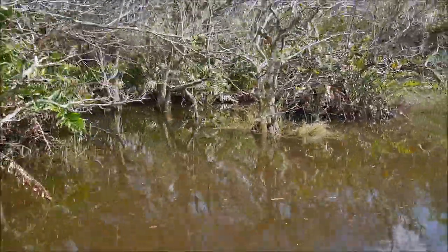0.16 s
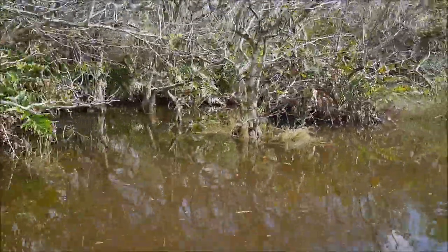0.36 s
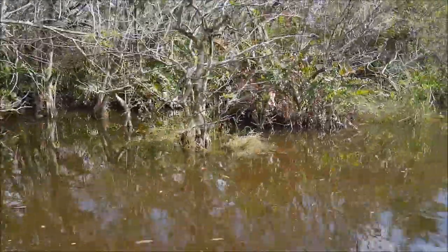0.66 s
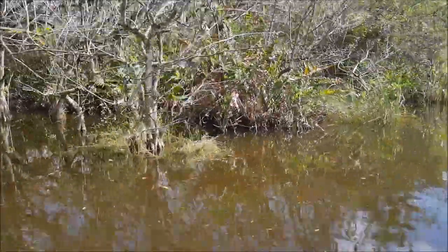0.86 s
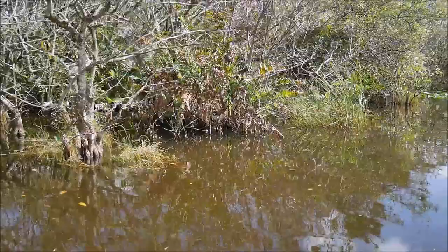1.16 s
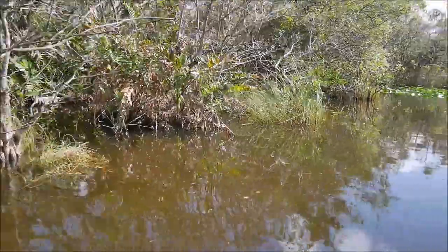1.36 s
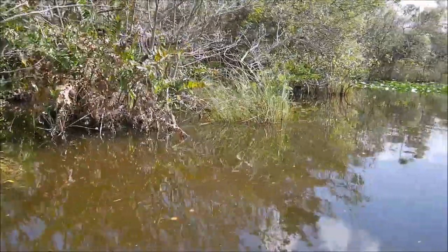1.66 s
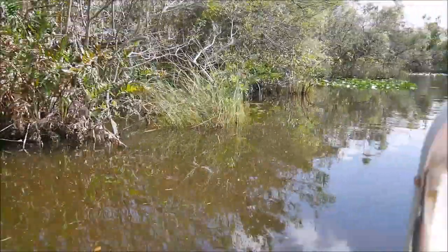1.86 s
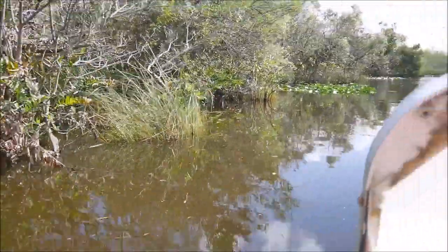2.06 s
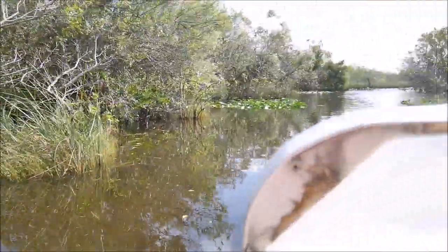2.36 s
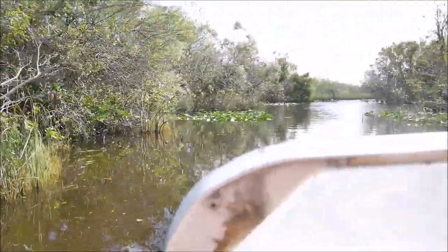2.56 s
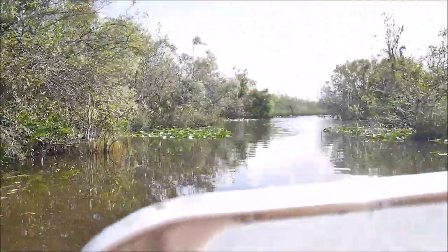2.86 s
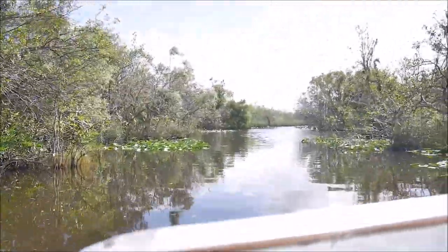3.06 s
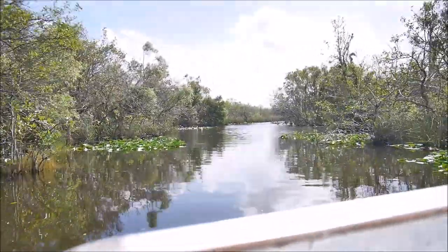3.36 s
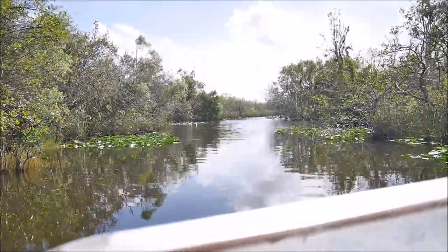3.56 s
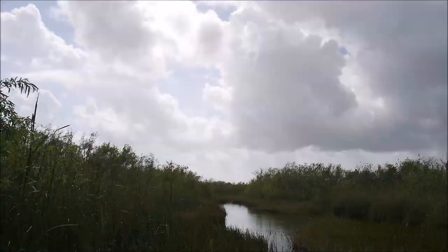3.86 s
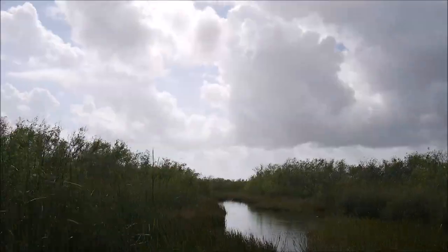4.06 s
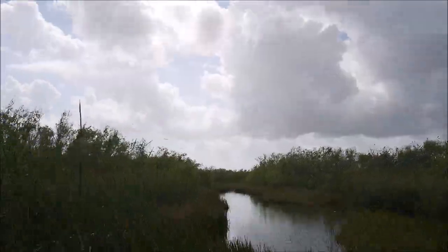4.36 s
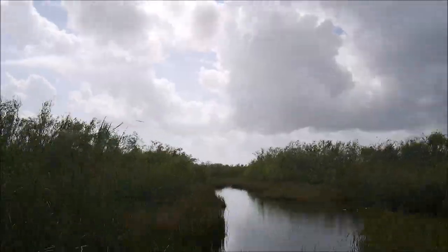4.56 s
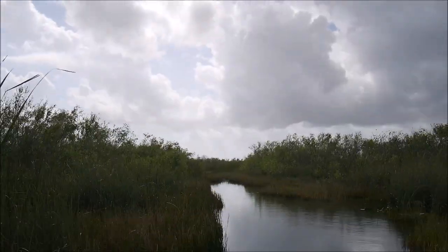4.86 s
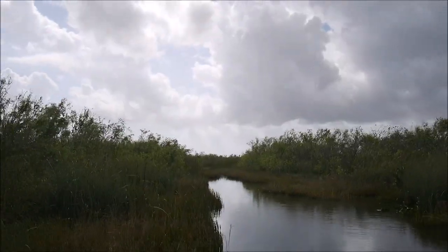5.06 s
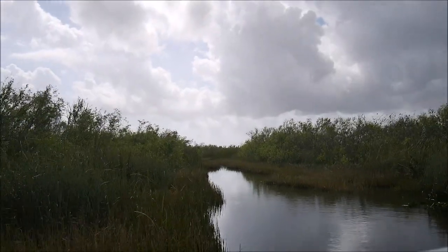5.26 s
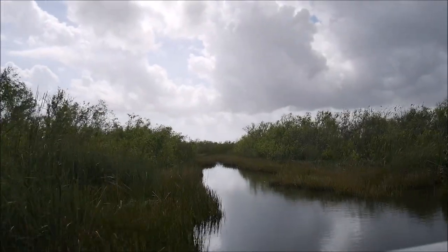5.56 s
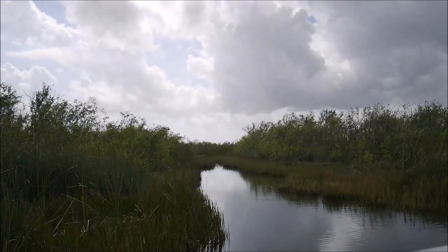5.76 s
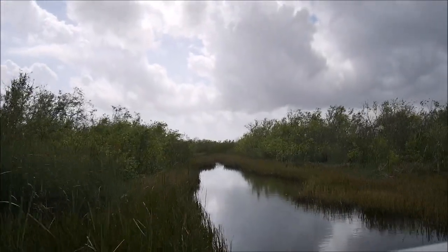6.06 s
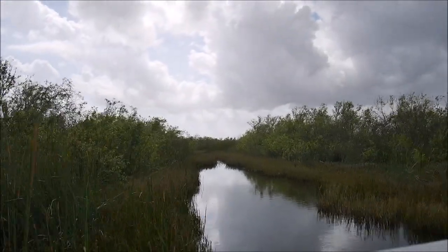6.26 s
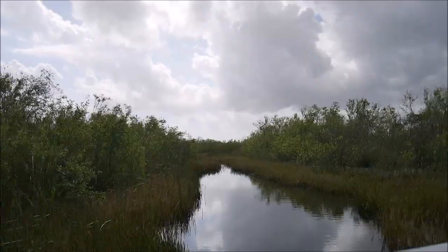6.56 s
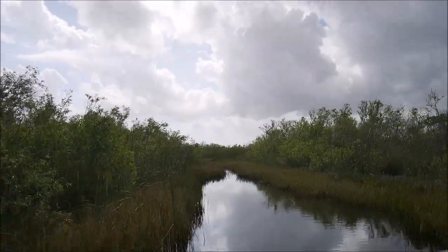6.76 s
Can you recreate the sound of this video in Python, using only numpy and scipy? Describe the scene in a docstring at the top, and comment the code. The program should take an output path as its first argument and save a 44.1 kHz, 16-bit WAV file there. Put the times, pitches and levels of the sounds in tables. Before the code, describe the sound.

Heard from a seat on an airboat in an open wetland channel, a big engine idles unevenly, its propeller thrumming and a slipping belt chirping rapidly over hiss and a thin whine. After almost four seconds it cuts abruptly to a brief silence. Then the engine cruises at nearly double speed, a dense propeller drone with ticking treble hiss and low wind gusts buffeting the microphones.

```python
"""On the water along a bushy bank: an airboat heard from a seat on board, in two stretches split by a brief silence.
First it idles: uneven cylinder firings make the exhaust lope, blade passes make the propeller thrum,
a pulley whines and a slipping belt chirps each engine cycle.
Then it cruises at nearly twice the speed: the same tone sums make propeller and exhaust drone,
a treble hiss ticks, and gusty low noise is the headwind buffeting the microphones."""
import sys
import numpy as np
from scipy import signal
from scipy.fft import rfft, irfft
from scipy.io import wavfile
from scipy.ndimage import uniform_filter1d

SR = 44100
rng = np.random.default_rng(int(sys.argv[2]) if len(sys.argv) > 2 else 0)


def unload_wav(signal):
    """Save mono or channel-first audio to the path in sys.argv[1] as 16-bit WAV at rate SR, clipped to [-1, 1]."""
    wavfile.write(
        sys.argv[1],
        SR,
        np.round(np.clip(np.atleast_2d(signal).T, -1, 1) * 32767).astype(np.int16),
    )


N = 304290
T = np.arange(N) / SR
HZ = np.fft.rfftfreq(N, 1 / SR)
IDLING, CRUISING = (0, 3.851), (4.15, 6.95)  # start and end of each stretch, s


def amp(db):
    """Logarithmic level: decibels to gain."""
    return 10 ** (np.asarray(db) / 20)


def unit(x):
    """Power normalization: scales to an rms of one."""
    return x / np.sqrt(np.mean(x ** 2) + 1e-20)


def curve(rows, axis=1):
    """Linear interpolation: one column of a timed table, at every sample."""
    rows = np.asarray(rows, float)
    return np.interp(T, rows[:, 0], rows[:, axis])


def pan(db):
    """Interaural level difference: left and right gains for a left-minus-right level."""
    return amp(np.array([np.atleast_1d(db), -np.atleast_1d(db)]) / 2)


def drift(rate_hz, size=64):
    """Low-pass random process: smooth motion with an rms of about one."""
    count = N // size + 1
    hz = np.fft.rfftfreq(count, size / SR)
    smoothing = np.exp(-(hz / rate_hz) ** 2)
    slow = irfft(rfft(rng.standard_normal(count)) * smoothing, count)
    return np.interp(np.arange(N), np.arange(count) * size, unit(slow))


def noise(table, order=8):
    """Spectral shaping: stereo noise with a given spectrum, falling away steeply beyond its ends."""
    hz, *levels = np.transpose(table)
    low_end = 1 + (hz[0] / (HZ + 1)) ** order
    high_end = 1 + (HZ / hz[-1]) ** (4 * order)
    ends = 1 / np.sqrt(low_end * high_end)

    def shaped(levels_db):
        gain = ends * amp(np.interp(np.log(HZ + 1), np.log(hz), levels_db))
        return irfft(rfft(rng.standard_normal(N)) * gain, N)

    mid, side = (shaped(levels_db) for levels_db in levels)
    return np.sqrt(SR / 2) * np.array([mid + side, mid - side])


def whistle(hz, width_hz):
    """Narrow-band noise moved to a carrier: a fuzzy tone of rms one that follows a pitch curve."""
    r = np.exp(-np.pi * width_hz / SR)
    grain = rng.standard_normal(N) + 1j * rng.standard_normal(N)
    fuzz = signal.lfilter([1], np.poly([r, r]), grain)
    carrier = np.exp(2j * np.pi * np.cumsum(hz) / SR)
    return unit((fuzz * carrier).real)


def high_pass(x, corner_hz, order):
    """High-pass filtering without phase shift: keeps what lies above the corner."""
    return irfft(rfft(x) / (1 + (corner_hz / (HZ + 1)) ** order), N)


def cycles_of(rpm, span):
    """Four-stroke timing: engine cycles since the start of a stretch, two crank turns each."""
    cycles = np.cumsum(curve(rpm)) / (120 * SR)
    return cycles - np.interp(span[0], T, cycles)


def burst(cycles, place, length, spread_db):
    """Periodic Gaussian pulse: a swell of varying size each cycle; also the distance from its centre in cycles."""
    turn = cycles - place + .5
    offset = turn % 1 - .5
    sizes = amp(spread_db * rng.standard_normal(size=512))
    size_now = sizes[np.floor(turn).astype(int) % len(sizes)]
    return size_now * np.exp(-.5 * (offset / length) ** 2), offset


# the microphones swing round: (time [s], facing [0 the bank .. 1 the bow], left minus right [dB])
FACING = [(0, 0.069, -1.4), (1.2, 0.29, -1.5), (2.0, 0.7, -1.5), (2.7, 0.78, -1.3), (3.25, 0.88, -3),
          (3.85, 0.9, -2)]


def swung(bank_db, bow_db):
    """Directivity: a level that follows the microphones' swing from the bank to the bow."""
    return bank_db + (bow_db - bank_db) * curve(FACING)


def tone_level(levels_db, cruising):
    """Peak from rms: gain of one tone, steady when cruising, following the swing at idle."""
    bank_db, bow_db, cruise_db = levels_db
    return np.sqrt(2) * amp(cruise_db if cruising else swung(bank_db, bow_db))


# the eight firings of one cycle, in order: relative strength [dB]
CYLINDERS = [-1, -0.5, -5.5, 0, 0, -1, -5.5, 1.5]
# exhaust tones: (multiple of the engine cycle, relative level facing the bank [dB], facing the bow [dB],
# cruising [dB])
EXHAUST = [(4, -71.5, -69.5, -44), (5, -33, -29, -26.5), (7, -31, -29, -79), (8, -35, -24.5, -20.5),
           (10, -38, -29, -51), (11, -33, -22, -62), (13, -32, -34.5, -38), (14, -60.5, -24, -76),
           (16, -55.5, -33, -35), (17, -60, -45, -41), (19, -56.5, -37, -69)]
# rise and fall of the firing tone at idle: (time [s], level [dB])
FIRING_TONE = [(0, 0), (0.25, 5), (1.0, -5), (1.7, 4.5), (2.3, 5.5), (2.75, -3), (3.1, -8), (3.55, 3),
               (3.85, 0.5)]


def exhaust(cycles, cruising, waver_db, waver_hz, lag, smear):
    """Fourier series of uneven firings: tones on multiples of the cycle, delayed and smeared by the pipe."""
    pattern, out = np.fft.fft(amp(CYLINDERS)), np.zeros(N)
    for k, *levels_db in EXHAUST:
        k = round(k)
        firing_phase = np.angle(pattern[k % len(pattern)])
        wave = np.cos(2 * np.pi * k * (cycles - lag) + firing_phase - smear * k ** 2)
        if k == len(CYLINDERS) and not cruising:
            wave = wave * amp(curve(FIRING_TONE))
        out += tone_level(levels_db, cruising) * amp(waver_db * drift(waver_hz)) * wave
    return out


def firing(cycles, depth):
    """Amplitude modulation by gas flow: eight puffs a cycle, each cylinder with its own strength."""
    count = len(CYLINDERS)
    strength = amp(CYLINDERS)[np.round(cycles * count).astype(int) % count]
    return unit(1 + depth * strength * np.cos(np.pi * count * cycles) ** 2)


def lope(cycles, depth_db, place):
    """Amplitude modulation at the cycle rate: the rocking idle swells and sinks once a cycle."""
    return unit(amp(depth_db * np.cos(2 * np.pi * (cycles - place))))


# propeller tones: (multiple of the blade rate, relative level facing the bank [dB], facing the bow [dB],
# cruising [dB])
PROPELLER = [(1, -61, -57, -26), (2, -31, -33.5, -20), (3, -23.5, -57, -22), (4, -33.5, -29, -30),
             (5, -30, -21.5, -29), (6, -32, -28, -38), (7, -32, -28, -37), (8, -31.5, -26.5, -37.5),
             (9, -30.5, -36, -43.5), (10, -45, -45.5, -46), (11, -52, -30.5, -45.5), (12, -46, -33.5, -49),
             (13, -57, -49.5, -51)]


def propeller(cycles, cruising, thrum_db, rough, rough_hz, spread, smear, waver_db):
    """Blade-passing harmonics, three passes a cycle: turbulent inflow shakes the upper ones most."""
    out, blade_hz = np.zeros((2, N)), 3 * (cycles[-1] - cycles[0]) / T[-1]
    for k, *levels_db in PROPELLER:
        k = round(k)
        upper = 1 / (1 + (300 / (k * blade_hz)) ** 6)  # near one well above 300 Hz
        shake = rough * (0.45 + upper)
        swing = 1 + shake * (drift(rough_hz) + 1j * drift(rough_hz))
        swing = swing / np.sqrt(1 + 2 * shake ** 2)
        # reflections from hull and cage smear each blade pulse
        turn = np.exp(2j * np.pi * 3 * k * cycles - 1j * smear * k ** 2)
        level = tone_level(levels_db, cruising) * amp(upper * thrum_db + waver_db * drift(5.9))
        wave = level * swing * turn
        # the left side leads a little, by a wavering amount
        apart = np.exp(1j * spread * k * (1 + 0.37 * drift(2.4)))
        out += np.array([(wave * apart).real, (wave / apart).real])
    return out


def right_late(pair, delay_ms):
    """Interaural time difference: the sound reaches the right microphone a moment after the left."""
    delay = np.exp(-2j * np.pi * HZ * delay_ms / 1000)
    return np.array([pair[0], irfft(rfft(pair[1]) * delay, N)])


# wash spectrum: (frequency [Hz], relative mid level [dB per Hz], relative side level [dB per Hz])
WASH = [(20, -70, -85.5), (45, -74, -71), (65, -71, -69.5), (101, -61.5, -75), (201, -49.5, -82),
        (413, -49, -80), (570, -54, -69), (790, -59, -68), (1290, -69, -73), (1910, -72, -81),
        (2550, -80.5, -93)]


def propeller_wash(cycles, thrum_db):
    """Turbulent broadband noise, modulated by the thrum, by random eddies and by the firings."""
    level_db = swung(-0.48, 0.76) + 0.18 * thrum_db + 0.76 * drift(21)
    return amp(level_db) * right_late(noise(WASH), delay_ms=0.044) * firing(cycles, depth=0.48)


# rise and fall of the pulley whine: (time [s], relative level [dB])
WHINE = [(0, -43.5), (0.5, -39.5), (0.8, -46), (1.45, -41.5), (1.7, -44.5), (2.16, -42), (2.23, -34),
         (2.36, -41), (3.4, -47)]


def pulley(rpm):
    """Rotation-locked tone: a fuzzy whine at 110 times the engine cycle, with a blurred octave above."""
    hz = 110 * rpm / 120
    central = 0.52 * whistle(hz, 16)
    sides = 0.78 * np.array([whistle(hz, 45), whistle(hz, 45)])
    whine = amp(curve(WHINE)) * (central + sides) * pan(2.5)
    overtone = amp(curve(WHINE) - 10.5) * whistle(2 * hz, 220)
    return whine + overtone


def spurts(cycles, table, spread_db):
    """Periodic amplitude modulation: envelope of a hiss that spurts in step with the engine."""
    swells = sum(height * burst(cycles, place, length, spread_db)[0] for place, length, height in table)
    return unit(2 + swells)


# idle hiss spectrum: (frequency [Hz], relative mid level [dB per Hz], relative side level [dB per Hz])
IDLE_HISS = [(2330, -75, -84.5), (3390, -74, -78), (4470, -77.5, -86), (5840, -78, -84), (6900, -71.5, -77),
             (9140, -65, -74), (10640, -67, -73), (11400, -72.5, -78), (13850, -78.5, -84),
             (15200, -86, -94)]
# spurts of the idle hiss: (place in the cycle [0-1], Gaussian width [cycles], relative height)
IDLE_SPURTS = [(.04, .08, 0.8), (.37, 0.076, 1), (.72, .06, 0.82)]


def idle_hiss(cycles):
    """Band splitting: a steady lower hiss, and a bright one that spurts with the engine and flickers."""
    hiss = amp(-.5) * noise(IDLE_HISS)
    bright = high_pass(hiss, 5500, order=8)
    steady = (hiss - bright) * amp(swung(2.0, -.8)) * pan(.6)
    puffs = spurts(cycles, IDLE_SPURTS, spread_db=2.8)
    return steady, bright * puffs * amp(2.0 * drift(294))


# belt slips in each idle cycle: (place in the cycle [0-1], Gaussian width [cycles], pitch [Hz],
# glide [Hz per cycle], relative level facing the bank [dB], facing the bow [dB])
SLIPS = [(0.041, 0.1, 8970, -5500, -22.5, -25.5), (0.278, 0.12, 7850, -2600, -39, -31),
         (.72, 0.079, 9560, -3500, -29.5, -26.5)]


def belt(cycles, width_hz, spread_db, wander_hz, scatter_hz, fuzz):
    """Stick-slip friction: each slip is a short, gritty squeak that falls from a slightly varying pitch."""
    out = np.zeros((2, N))
    for place, length, hz, glide_hz, bank_db, bow_db in SLIPS:
        swell, offset = burst(cycles, place, length, spread_db)
        pitch = hz + glide_hz * offset + wander_hz * drift(400) + scatter_hz * drift(24.78)
        squeak = np.cos(2 * np.pi * np.cumsum(pitch) / SR) + fuzz * whistle(pitch, width_hz)
        side = .3 * np.array([[1], [-1]]) * whistle(pitch, width_hz)
        out += amp(swung(bank_db, bow_db)) * swell * (unit(squeak) + side)
    return out


# dull knocks: (time [s], relative envelope peak [dB])
KNOCKS = [(2.3564, -3.5), (2.855, -7)]


def knocks(hz, decay_s):
    """Damped oscillation: short, heavily damped thuds."""
    out = np.zeros(N)
    for s, db in KNOCKS:
        age = np.maximum(T - s, 0)
        envelope = age / decay_s * np.exp(1 - age / decay_s)
        out -= amp(db) * np.sin(2 * np.pi * hz * age) * envelope
    return out


# crankshaft speed at idle: (time [s], speed [turns per minute])
IDLE_RPM = [(0.0, 1910), (0.48, 1919), (0.96, 1931), (1.44, 1927), (1.92, 1914), (2.41, 1930), (2.89, 1923),
            (3.37, 1934), (3.85, 1929)]
# mid-range swell of propeller thrum and, more weakly, of the wash: (time [s], relative level [dB])
IDLE_THRUM = [(0, -3), (0.4, 3.5), (0.95, -5.5), (1.6, 0), (2.0, -1), (2.38, 7), (2.7, 4), (3.27, 1.5),
              (3.42, -2.5)]
# chirps and spurts sink slightly, then recover, crossing to the right as the microphones swing round:
# (time [s], level [dB], left minus right [dB])
CHIRPS = [(0, 1, 3), (0.55, 1.5, 2.5), (1.4, 0.2, 2), (2.6, -1, 0), (3.85, 1.3, -2.8)]


def idling():
    """Superposition of cycle-locked sources: loping exhaust, propeller, wash, whine, hiss, chirps and knocks."""
    cycles = cycles_of(IDLE_RPM, IDLING)
    thrum_db = curve(IDLE_THRUM)
    tones = amp(-1.5) * exhaust(cycles, False, waver_db=2.0, waver_hz=1, lag=-0.2052, smear=0.0564)
    tones = tones + amp(-1.8) * propeller(cycles, False, thrum_db, rough=0.79, rough_hz=4.0,
                                          spread=0.022, smear=1.02, waver_db=1.4)
    drone = tones * lope(cycles, depth_db=1.0, place=0.8) + propeller_wash(cycles, thrum_db)
    whine = pulley(curve(IDLE_RPM))
    steady_hiss, spurting = idle_hiss(cycles)
    chirps = belt(cycles, width_hz=700, spread_db=1.6, wander_hz=150, scatter_hz=90, fuzz=.8)
    treble = (spurting + chirps) * amp(curve(CHIRPS)) * pan(curve(CHIRPS, axis=2))
    drone = (drone + knocks(hz=332, decay_s=0.0012)) * pan(curve(FACING, axis=2))
    return drone + whine + steady_hiss + treble


GUST_RISE = .5  # rise time as a share of a gust's length
GUST_GRAIN_DB, GUST_GRAIN_HZ = -1.2, 200  # small eddies within a gust
# gusts that strike the microphones: (time of the peak [s], length [s],
# added amplitude relative to the steady wind [dB], left minus right [dB])
GUSTS = [(4.489, 0.037, 1, 3), (4.582, 0.038, 4, 3), (4.694, 0.064, -1.5, 0), (4.75, 0.011, -7, -3),
         (4.817, 0.018, 5.5, 5), (4.867, 0.015, 1, -4), (4.954, 0.025, 1, 6), (5.083, 0.029, -14, -17),
         (5.152, 0.031, 5.5, 1), (5.289, 0.046, 4.5, 0), (5.382, 0.029, -9, -11), (5.512, 0.023, 4, 6),
         (5.693, 0.02, 5, 2), (5.74, 0.032, 6.5, 2), (6.245, 0.056, -7, -7), (6.42, 0.068, -4.5, -1),
         (6.541, 0.011, 1, 2), (6.694, 0.019, 0, 5), (6.804, 0.038, 4.5, 6), (6.841, 0.042, 4.5, 1)]


def gusts():
    """Transient turbulence: rise of the wind in dB on each side, fast to swell and slower to die away."""
    out = np.zeros((2, N))
    for s, length, db, side_db in GUSTS:
        age = np.maximum(1 + (T - s) / (GUST_RISE * length), 0)
        out += amp(db) * pan(side_db) * (age * np.exp(1 - age)) ** 2
    grain = amp(GUST_GRAIN_DB * drift(GUST_GRAIN_HZ))
    return 20 * np.log10(1 + out * grain)


GUST_TOP_HZ = 2000  # gusts add little above this
# wind spectrum: (frequency [Hz], relative mid level [dB per Hz], relative side level [dB per Hz])
WIND = [(20, -78, -76), (45, -69, -69), (69, -57, -64), (132, -48.5, -59), (251, -45.5, -50),
        (394, -46, -58.5), (610, -53.5, -53), (896, -56.5, -54), (1420, -67, -63.5), (2170, -72, -73),
        (3480, -79.5, -79)]


def headwind(gust_db):
    """Turbulent pressure on the microphones: a low buffet and a rasp that both swell in the gusts."""
    eddies = drift(33)
    wind = noise(WIND)
    low = irfft(rfft(wind) / (1 + (HZ / 700) ** 4), N)
    buffet = low * amp(-2.1 + 0.92 * gust_db + 1.1 * eddies) * pan(-9.5)
    gust_band = irfft(rfft(wind - low) / np.sqrt(1 + (HZ / GUST_TOP_HZ) ** 4), N)
    surge = gust_band * (amp(gust_db) - 1)
    rasp = (wind - low + surge) * amp(-1.5 + .8 * eddies) * pan(-2.5)
    return buffet + rasp


# cruising hiss spectrum: (frequency [Hz], relative mid level [dB per Hz], relative side level [dB per Hz])
CRUISE_HISS = [(3140, -74.5, -81.5), (5000, -77, -82.5), (7850, -79, -85), (9700, -75.5, -82.5),
               (13700, -76.5, -80), (15300, -79, -93)]
# spurts of the cruising hiss: (place in the cycle [0-1], Gaussian width [cycles], relative height)
CRUISE_SPURTS = [(0.6, 0.034, 2.8), (0.96, 0.05, 0.4), (0.2, 0.049, 0.2)]
# rise and fall of the treble ticking: (time [s], level [dB])
TICKING = [(4.15, 0), (4.7, 1), (5.55, -1.5), (5.85, -1.5), (6.06, 0.5), (6.2, 1), (6.9, -1)]


def ticking_hiss(cycles, level_db):
    """Periodic modulation of noise: the treble of the hiss ticks in step with the engine, with a random grit."""
    hiss = amp(level_db) * noise(CRUISE_HISS)
    bright = high_pass(hiss, 5800, order=4)
    ticking = spurts(cycles, CRUISE_SPURTS, spread_db=4.6)
    grit = amp(1.8 * drift(700))
    ticking = ticking * grit * amp(curve(TICKING))
    return hiss + bright * (ticking - 1)


DIP_S = 0.036  # time constant for a dip to set in and to recover
DRONE_DIP, HISS_DIP = 0.7, 0.56  # dB that each sinks per dB of smoothed gust
# crankshaft speed when cruising: (time [s], speed [turns per minute])
CRUISE_RPM = [(4.15, 3622), (4.49, 3630), (4.84, 3616), (5.18, 3621), (5.52, 3625), (5.87, 3624),
              (6.21, 3614), (6.56, 3613), (6.9, 3625)]
# rise and fall of the upper blade tones when cruising: (time [s], relative level [dB])
CRUISE_THRUM = [(4.15, 2), (4.6, 9.5), (4.78, 2.5), (4.88, 7), (5.46, 6.5), (5.58, -2), (5.8, 6), (6.68, 7),
                (6.9, -12)]


def cruising():
    """Superposition with level coupling: drone and hiss dip just after each gust of the headwind."""
    cycles = cycles_of(CRUISE_RPM, CRUISING)
    gust_db = gusts()
    keep = np.exp(-1 / (DIP_S * SR))
    dip_db = signal.lfilter([1 - keep], [1, -keep], gust_db.mean(axis=0))
    tones = amp(1.6) * exhaust(cycles, True, waver_db=1.0, waver_hz=7.4, lag=0.045, smear=0.0456)
    tones = tones + amp(0.5) * propeller(cycles, True, curve(CRUISE_THRUM), rough=0.4, rough_hz=12.3,
                                         spread=0.029, smear=.8, waver_db=0.5)
    drone = tones * amp(-DRONE_DIP * dip_db) * pan(-1.0)
    wind = headwind(gust_db) * firing(cycles, depth=0.19)
    hiss = ticking_hiss(cycles, 1.3 - HISS_DIP * dip_db) * firing(cycles, depth=0.22) * pan(-1.6)
    return drone + wind + hiss


def during(span):
    """Rectangular gating: one within a stretch, zero outside, with abrupt edges."""
    inside = (T >= span[0]) & (T < span[1])
    return uniform_filter1d(inside.astype(float), size=40)


def scene():
    """Succession in time: the idling stretch, a brief silence, the cruising stretch."""
    return idling() * during(IDLING) + cruising() * during(CRUISING)


CUTOFF_HZ = 15650


def record(dry):
    """Band limiting and overload: a narrow treble notch, clipping at full scale, then a steep low-pass."""
    notched = signal.lfilter(*signal.iirnotch(7860, 40, fs=SR), dry)
    band_limit = signal.firwin(401, CUTOFF_HZ, window=("kaiser", 9), fs=SR)
    return signal.oaconvolve(np.clip(notched, -1, 1), band_limit[None], "same")


dry = scene()
out = record(dry)
unload_wav(out)
```